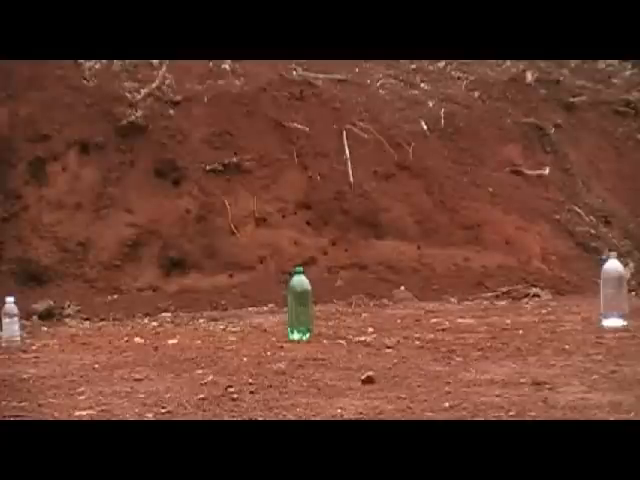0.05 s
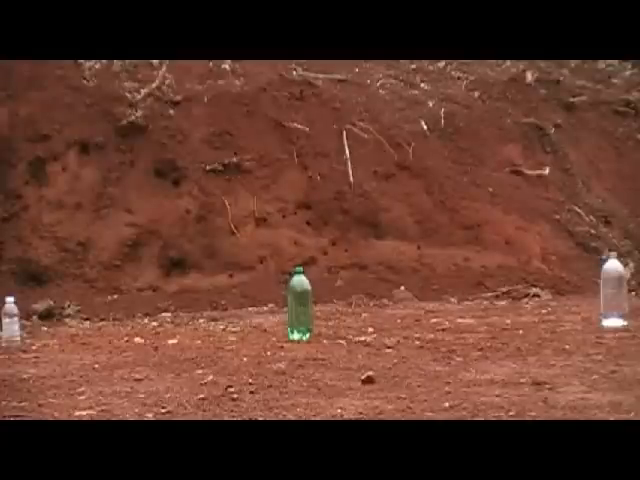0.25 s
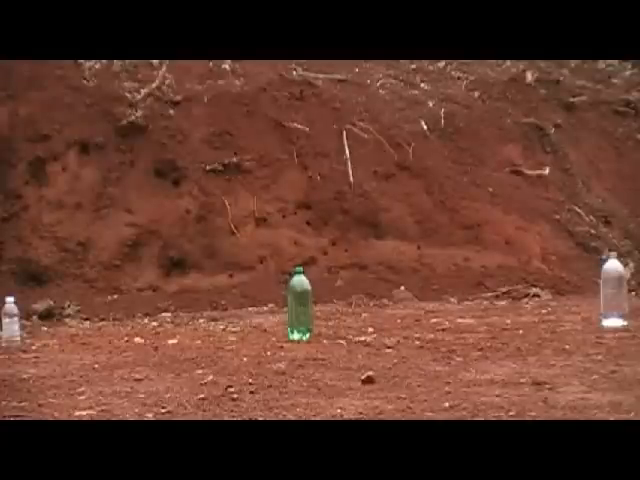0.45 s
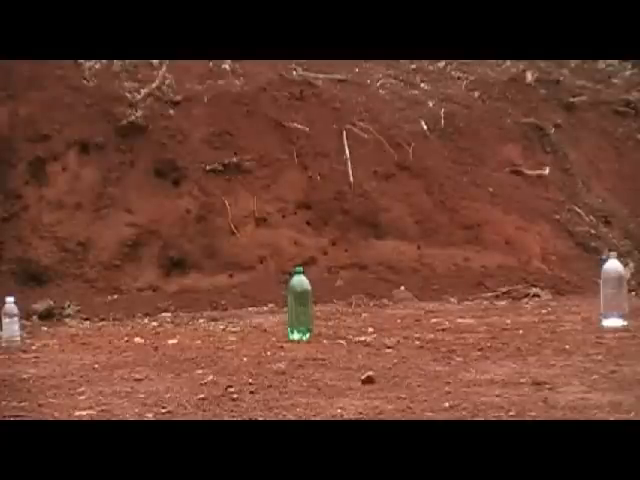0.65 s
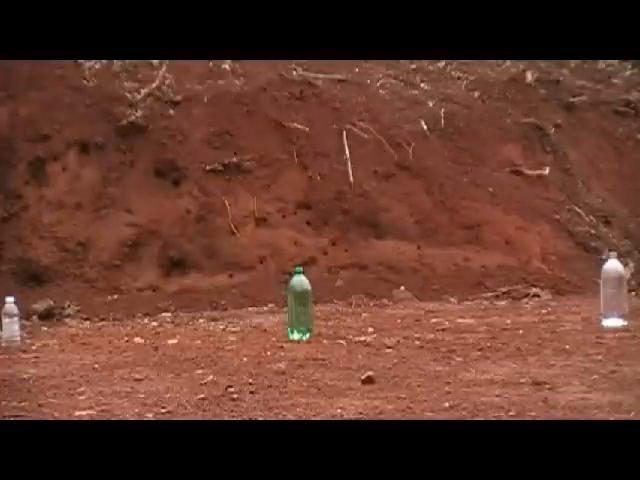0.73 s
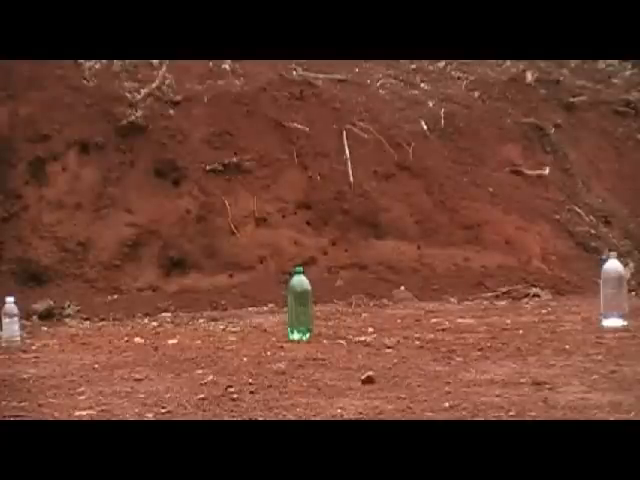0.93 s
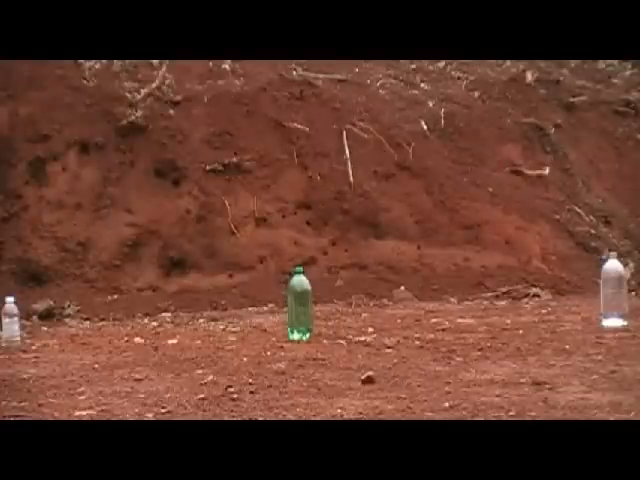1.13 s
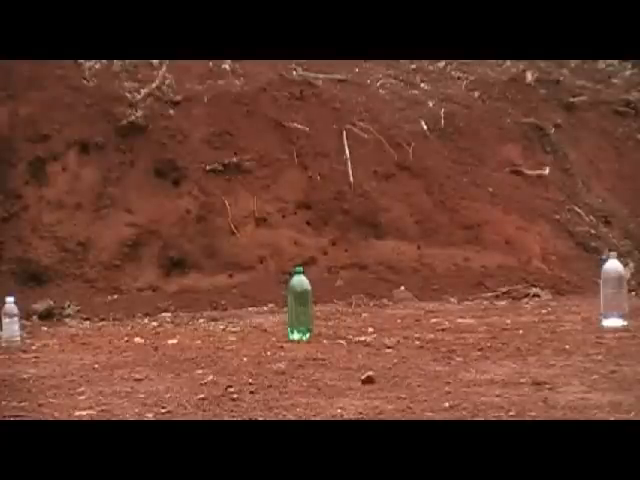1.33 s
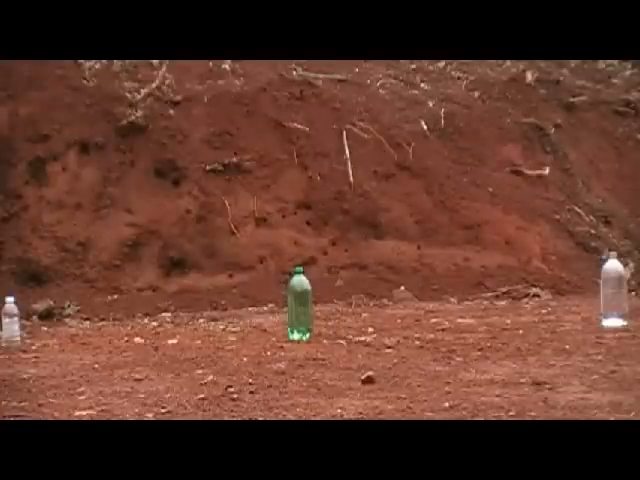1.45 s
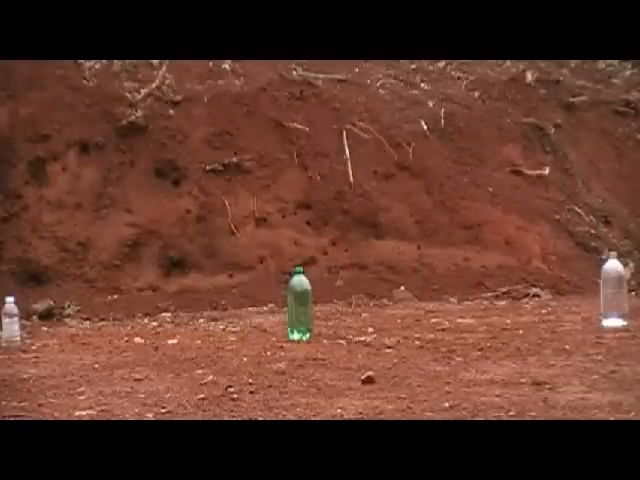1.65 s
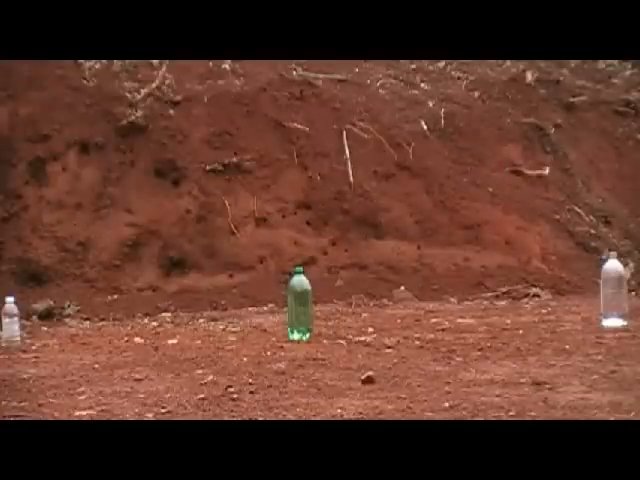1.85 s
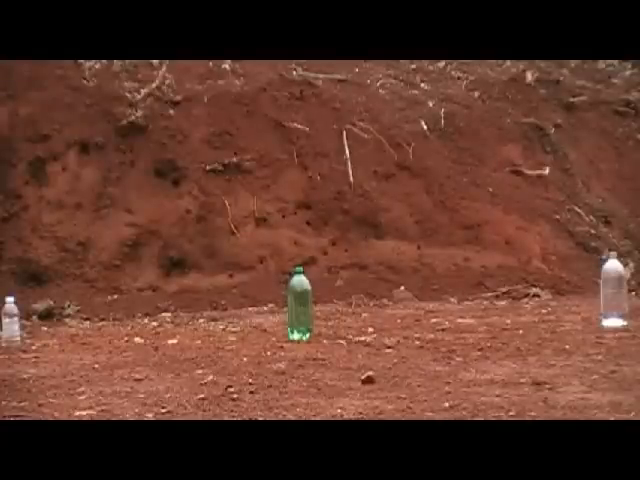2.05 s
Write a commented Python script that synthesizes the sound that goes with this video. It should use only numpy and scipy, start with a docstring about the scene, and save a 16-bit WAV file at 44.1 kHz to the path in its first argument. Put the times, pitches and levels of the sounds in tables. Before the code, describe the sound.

Close by in the open air, a shotgun's pump scrapes and clatters open, then slams shut with a brief steel ring. After a light rustle and a tick, the hammer clicks sharply without a shot, over faint air noise.

```python
"""Racking a pump-action shotgun

The action slides back and forward outdoors: friction and clashes excite the modes of the steel,
and the slide thumps at its end stops. Soft handling follows, a tick, then the click of the hammer.
The ground and an earth bank answer, and a gain control ducks the loudest moments.
Behind it lie faint air noise, a distant rumble and two thin bird notes."""
import sys
import numpy as np
from scipy import signal
from scipy.fft import rfft, irfft
from scipy.io import wavfile
from scipy.ndimage import uniform_filter1d

SR = 44100
rng = np.random.default_rng(int(sys.argv[2]) if len(sys.argv) > 2 else 0)


def int16_out(signal):
    """Quantize to a 16-bit WAV file."""
    q = np.round(np.clip(np.atleast_2d(signal).T, -1, 1) * 32767)
    wavfile.write(sys.argv[1], SR, q.astype(np.int16))


N = 92610
TIME_S = np.arange(N) / SR
FREQ_HZ = np.fft.rfftfreq(2 * N, 1 / SR)


def amp(db):
    """Amplitude grows tenfold for every 20 dB."""
    return 10 ** (np.asarray(db) / 20)


def unit_rms(x):
    """Normalisation to a mean power of one."""
    return x / np.sqrt(np.mean(x ** 2) + 1e-20)


def add(track, start_s, piece):
    """Superposition: a short sound sums into a track."""
    track[..., round(start_s * SR):][..., :piece.shape[-1]] += piece


def spectrum(points):
    """A spectral envelope joins (frequency_hz, gain_db) points on a log frequency axis."""
    hz, db = np.transpose(points)
    return amp(np.interp(np.log(FREQ_HZ + 1), np.log(hz + 1), db))


def minimum_phase(gain):
    """Folding the cepstrum gives a causal response with this gain."""
    cepstrum = irfft(np.log(np.maximum(gain, 1e-6)))
    cepstrum[1:N] *= 2
    cepstrum[N + 1:] = 0
    return np.exp(rfft(cepstrum))


def filtered(x, response):
    """Convolution in time is multiplication in frequency."""
    return irfft(rfft(x, 2 * N) * response)[..., :N]


def resonance(hz, width_hz):
    """A damped oscillator responds most at its natural frequency."""
    damping = 1j * FREQ_HZ * width_hz
    return damping / (hz ** 2 - FREQ_HZ ** 2 + damping)


# Spectrum of the air noise: frequency_hz, gain_db
AIR_SPECTRUM = [(15, -48.5), (25, -22.5), (102, -11), (500, -16.5), (2100, -24.5), (11800, -43.5),
                (13000, -66)]

def background():
    """Filtered noise: a broad band is heard as air, a narrow low band as distant rumble."""
    air = unit_rms(filtered(rng.standard_normal((2, N)), spectrum(AIR_SPECTRUM)))
    rumble = unit_rms(filtered(rng.standard_normal(N), resonance(hz=100.7, width_hz=19) ** 2))
    return (amp(-57.5) * air + amp(-64) * rumble) * amp([[-1], [1]])  # louder on the right


def grit(depth_db, size=N):
    """Tiny uneven contacts modulate noise. Rows: common to both microphones, differing between them."""
    noise = rng.standard_normal((2, size))
    roughness = unit_rms(uniform_filter1d(rng.standard_normal(size), size=16))
    return unit_rms(noise * amp(depth_db * roughness))


def burst(start_s, hold_s, t60_s, size=N, attack_s=0.0003):
    """A transient's envelope rises, holds and decays exponentially."""
    t = np.arange(size) / SR - start_s
    return np.clip(t / attack_s, 0, 1) * amp(-60 * np.maximum(t - hold_s, 0) / t60_s)


def chatter(length_s, t60_s, size=4096):
    """An impact is a run of tiny hard contacts, so its energy spreads evenly over frequency."""
    envelope = burst(0, length_s, t60_s, size)
    contacts = envelope * grit(depth_db=3, size=size)
    whitened = irfft(np.exp(1j * np.angle(rfft(contacts))))
    return unit_rms(whitened * np.sqrt(envelope)) * np.sqrt(np.mean(envelope ** 2))


def struck_part(force, hz, width_hz):
    """A small steel part rings in one mode, in proportion to the force on it."""
    mode = signal.iirpeak(hz, hz / width_hz, SR)
    return force.std() * unit_rms(signal.lfilter(*mode, force))


def radiate(force, body, treble_hz, bass_hz=753.6):
    """Source and filter: the bass, middle and treble of a force drive a body's response."""
    bass = 1 / (1 + (FREQ_HZ / bass_hz) ** 4)
    treble = 1 - 1 / (1 + (FREQ_HZ / treble_hz) ** 6)
    low, middle, high = rfft(force, 2 * N)
    drive = low * bass + middle * (1 - bass - treble) + high * treble
    return irfft(drive * body)[:, :N]


# Broad response of the whole gun: frequency_hz, gain_db
BODY_SPECTRUM = [(40, -42), (189, -16), (294, -10.5), (600, -12), (1030, -9), (1290, -8), (1910, 3.5),
                 (2270, -9), (2690, 1), (3050, -5.5), (3530, -1.5), (9220, -6.5), (11000, -13.5),
                 (12700, -16.5), (14000, -30.5)]

def steel_body(modes):
    """Modes add in power to the gun's broad response; the slower the decay, the narrower the peak."""
    power = unit_rms(spectrum(BODY_SPECTRUM)) ** 2
    for hz, db, t60_s in modes:
        peak = abs(resonance(hz, width_hz=np.log(1000) / np.pi / t60_s))
        power += (amp(db - 3) * unit_rms(peak)) ** 2
    return minimum_phase(np.sqrt(power))


# Clashes of steel parts: start_s, level_db, length_s, bass_db, treble_db, part_hz, part_db
CLASHES = [(0.1987, -48.5, 0.006, 7, -28, 2000, 4.5), (0.208, -35, 0.0028, 7.5, -36, 3000, -0.5),
           (0.2195, -33.5, 0.0056, -4.5, -10, 2000, -7.5), (0.226, -27, 0.003, -2, -9.5, 1880, -10),
           (0.2286, -17.5, 0.0042, -4, -3, 2020, -17), (0.2556, -20, 0.004, 2, 4, 1640, -5.5),
           (0.2717, -16, 0.0039, -9.5, 2, 3170, -12.5), (0.2938, -15, 0.0048, -3, 3.5, 1560, -5),
           (0.2989, -11, 0.0025, 3, 1.5, 3340, -6.5), (0.3033, -10, 0.0013, 8, 10, 1130, -7.5),
           (0.3267, -19.5, 0.0071, -3, 8, 1170, -1.5), (0.3473, -20, 0.0014, -4, 7.5, 6000, 1.5),
           (0.357, -26, 0.0071, 11.5, 9, 1430, -5.5), (0.412, -32, .002, 12, 3.5, 2600, -15),
           (0.431, -40, 0.0011, 2, 7, 1950, 2.5), (0.474, -39, 0.0011, 10, -1.5, 1990, 0),
           (0.5489, -38.5, 0.0036, -11, -10.5, 1890, -6), (0.555, -22.5, 0.0017, -7.5, -7, 4500, -8),
           (0.579, -22.5, 0.0032, -13, -4.5, 3320, 0), (0.5845, -15.5, 0.0022, -17.5, 3.5, 3754, -2.5),
           (0.596, -19, 0.007, 7, -1, 1820, -13.5), (0.6117, -13.5, 0.0068, -1, -5.5, 2950, -9.5),
           (0.6186, -10, 0.0045, 5, -3, 1880, -15), (0.6407, -17, 0.0041, 13, -6.5, 1850, -2.5),
           (0.65, -19, 0.01, 4, 0.5, 9240, -5.5), (0.662, -10, 0.0032, 7.5, 7.5, 2680, -9),
           (0.6706, -13, 0.0029, 8, 5.5, 7880, 1), (0.6778, -11.5, 0.0039, 6, 1.5, 1740, -2),
           (0.681, -6.5, 0.0027, 0.5, 7, 2870, -11.5), (0.6865, -11, 0.0031, -8.5, 5, 1472, -9)]
# Fore-end rubbing along the tube, back stroke then forward stroke: time_s, level_db
SLIDE_STROKES = [
    [(.205, -63), (.24, -37.5), (.25, -40), (.285, -28), (.34, -22.5), (.372, -36.5), (.43, -42),
     (.53, -53)],
    [(.55, -43), (.575, -37), (.595, -28), (.61, -21.5), (.628, -18), (.655, -27), (.69, -33),
     (.715, -34.5)],
]
# Modes of receiver and barrel, opening then closing: pitch_hz, relative_db, t60_s
STEEL_MODES = [
    [(222, -30.5, .25), (1144, -12, .09), (1628, -8, 0.082), (2000, -11.5, .1), (3250, -9, .04),
     (4600, -12.5, .03), (5450, -11.5, .03), (6084, -10.5, 0.033)],
    [(324, -23.5, 0.089), (1077, -13, .03), (1789, -13, .06), (2730, -12, 0.027), (3355, -11, 0.037),
     (4210, -10, .06), (5540, -9.5, 0.033), (7000, -12.5, .03), (9100, -12.5, .04)],
]

def pump_action():
    """Impact and sliding friction force the gun to vibrate, in different modes as it opens and closes."""
    force, sound = np.zeros((3, 2, N)), np.zeros((2, N))
    for start_s, db, length_s, bass_db, treble_db, part_hz, part_db in CLASHES:
        clash = amp(db) * chatter(length_s, t60_s=0.023)
        add(force, start_s, amp([bass_db, 0, treble_db])[:, None, None] * clash)
        add(sound, start_s, amp(part_db) * struck_part(clash, part_hz, width_hz=150))
    friction_bands = amp([5.5, 0, 0.5])[:, None, None]  # bass, middle, treble
    for stroke in SLIDE_STROKES:
        times_s, db = np.transpose(stroke)
        sliding = (TIME_S > times_s[0]) * (TIME_S < times_s[-1])
        pressure = amp(np.interp(TIME_S, times_s, db)) * sliding
        force += friction_bands * pressure * grit(depth_db=4.5)
    opening = TIME_S < SLIDE_STROKES[0][-1][0]  # until the back stroke ends
    for during, modes in zip([opening, ~opening], STEEL_MODES):
        sound += radiate(force * during, steel_body(modes), treble_hz=5650)
    return sound


def damped_sine(start_s, db, hz, t60_s):
    """Free vibration of one mode dies away exponentially."""
    t = np.maximum(TIME_S - start_s, 0)
    return amp(db - 60 * t / t60_s) * np.sin(2 * np.pi * hz * t)


# The slide hitting its end stops: start_s, level_db
STOP_IMPACTS = [(0.299, -35.5), (.678, -31)]

def end_stops():
    """Each sudden stop excites a low, heavily damped vibration: a thump."""
    return sum(damped_sine(start_s, db, hz=62, t60_s=0.04) for start_s, db in STOP_IMPACTS)


# High modes struck as the bolt locks: pitch_hz, relative_db, t60_s
BOLT_MODES = [(5647, -4, .26), (6266, 0, .31), (9925, -4, .25)]

def bolt_lock(start_s=0.681, level_db=-29):
    """Lightly damped modes keep the steel singing after the bolt locks."""
    return sum(damped_sine(start_s, level_db + db, hz, t60_s) for hz, db, t60_s in BOLT_MODES)


# Soft handling rustle, then at 2 s a faint echo of the hammer click from the bank: time_s, level_db
HANDLING_AND_ECHO_LEVELS = [(0.929, -59.5), (.99, -54), (1.08, -58), (1.2, -61), (1.32, -71), (1.88, -100),
                            (2.0, -62), (2.1, -77.5)]
# Spectrum shared by rustle and echo: frequency_hz, gain_db
HANDLING_AND_ECHO_SPECTRUM = [(100, -18), (500, 3), (3000, 3.5), (6000, -7.5), (10000, -19), (13000, -41)]

def handling_and_echo():
    """Swells of uneven noise stand for handling friction, then the bank's diffuse echo of the hammer."""
    times_s, db = np.transpose(HANDLING_AND_ECHO_LEVELS)
    envelope = amp(np.interp(TIME_S, times_s, db)) * (TIME_S > times_s[0])
    return envelope * unit_rms(filtered(grit(depth_db=3.5), spectrum(HANDLING_AND_ECHO_SPECTRUM)))


# Clicks of trigger and hammer: start_s, level_db, length_s, treble_db, part_hz, part_db
TRIGGER_CLICKS = [(1.116, -48, 0.0009, 0.5, 4340, -6), (1.1213, -41, 0.0027, -10.5, 4270, -4),
                  (1.1249, -35.5, 0.0034, -5, 3480, -14), (1.2, -58, 0.0022, -7, 8830, 0.5),
                  (1.3945, -59.5, 0.0011, -16, 4020, -1), (1.594, -53, 0.0042, -16, 3750, -8),
                  (1.783, -18.5, 0.0026, 1, 4700, -17.5), (1.7957, -37, .0006, 8, 5000, -3.5)]
# Modes of the trigger group: pitch_hz, width_hz, relative_db
TRIGGER_MODES = [(344, 90, -2), (976, 100, -12), (1580, 63, 5), (1714, 155, 7.5), (2383, 123, 0.5),
                 (2716, 136, -3), (3925, 137, -1.5), (4720, 610, -3), (6060, 450, -3), (7480, 244, -1.5),
                 (7820, 143, -0.5), (8530, 370, 2)]

def trigger_group():
    """Brief impacts on well-damped modes are heard as clicks; each also rings a small part of its own."""
    force, parts = np.zeros((3, 2, N)), np.zeros((2, N))
    for start_s, db, length_s, treble_db, part_hz, part_db in TRIGGER_CLICKS:
        snap = amp(db) * chatter(length_s, t60_s=0.012)
        add(force, start_s, amp([0, 0, treble_db])[:, None, None] * snap)
        add(parts, start_s, amp(part_db) * struck_part(snap, part_hz, width_hz=450))
    modes = sum(amp(db) * resonance(hz, width_hz) for hz, width_hz, db in TRIGGER_MODES)
    crack = amp(-14) * unit_rms(spectrum(BODY_SPECTRUM))
    body = minimum_phase(np.hypot(unit_rms(abs(modes)), crack))
    return parts + radiate(force, body, treble_hz=2366)


# Distant bird notes: start_s, length_s, pitch_hz, rise_hz, level_db
BIRD_NOTES = [(1.697, 0.0517, 7400, 798, -74), (2.019, 0.062, 7630, 30.1, -70)]

def birds():
    """Frequency modulation: each whistle is a pure tone whose pitch rises and falls in an arch."""
    sound = np.zeros(N)
    for start_s, length_s, hz, rise_hz, db in BIRD_NOTES:
        arch = np.sin(np.pi * np.clip((TIME_S - start_s) / length_s, 0, 1))
        phase = 2 * np.pi * np.cumsum(hz + rise_hz * arch) / SR
        sound += amp(db) * np.sqrt(abs(arch)) * np.sin(phase)
    return sound


# Scatter from nearby ground: frequency_hz, gain_db
GROUND_SPECTRUM = [(100, -22.5), (500, -11), (2000, -16), (8000, -10), (13000, -14.5)]

def ground_scatter(x):
    """Diffuse reflection gives each microphone its own short, decaying tail."""
    reflected = filtered(x, minimum_phase(spectrum(GROUND_SPECTRUM)))
    tail = rng.standard_normal((2, N)) * burst(start_s=0.0033, hold_s=0, t60_s=0.13)
    tail /= np.linalg.norm(tail, axis=1, keepdims=True)
    return filtered(reflected, rfft(tail, 2 * N))


# Returns from the ground, the earth bank and the wider surroundings: level_db, delay_s, t60_s
REFLECTIONS = [(-19, 0.0085, 0.15), (-36.5, .15, .22), (-32.5, 0.022, 1)]
# Spectrum of their reverberation: frequency_hz, gain_db
REVERB_SPECTRUM = [(100, -12.5), (400, 1.5), (2000, 2.5), (5000, 1), (9500, -6.5), (12500, -24.5)]

def reverberation(x):
    """Countless reflections add incoherently, into noise that trails the power of the source."""
    decay = sum((amp(db) * unit_rms(burst(delay_s, 0, t60_s))) ** 2
                for db, delay_s, t60_s in REFLECTIONS) / N
    power = abs(filtered(x ** 2, rfft(decay, 2 * N)))
    return np.sqrt(power) * unit_rms(filtered(rng.standard_normal((2, N)), spectrum(REVERB_SPECTRUM)))


# Sound that differs between the two microphones: frequency_hz, gain_db
SIDE_SPECTRUM = [(100, -13), (1200, -11), (4000, -7), (12000, -11.5)]

def direct_path(common, differing, pan_db=3.5, left_lag_s=2.6e-5):
    """Differences in level and arrival time place the gun slightly to the right."""
    side = np.array([[1], [-1]])
    stereo = common + side * filtered(differing, spectrum(SIDE_SPECTRUM))
    delay = np.exp(-1j * np.pi * side * FREQ_HZ * left_lag_s)
    return filtered(stereo, amp(-side * pan_db / 2) * delay)


def scene():
    """The gun's direct sound, its reflections and the distant sources superpose."""
    common, differing = pump_action() + trigger_group() + handling_and_echo()
    common += end_stops() + bolt_lock()
    gun = direct_path(common, differing) + ground_scatter(common) + reverberation(common)
    return gun + background() + birds()


def record(dry):
    """Automatic gain control ducks loud sounds and recovers steadily; clipping and a low-pass follow."""
    threshold_db, slope, recovery_db_per_s = -25.5, 0.41, 18
    ceiling, cutoff_hz = 0.85, 13200
    power = uniform_filter1d(np.mean(dry ** 2, axis=0), size=882)  # 20 ms average
    excess_db = np.maximum(10 * np.log10(abs(power) + 1e-12) - threshold_db, 0)
    recovery_db = recovery_db_per_s * TIME_S
    cut_db = np.maximum.accumulate(slope * excess_db + recovery_db) - recovery_db
    clipped = np.clip(dry * amp(-cut_db), -ceiling, ceiling)
    return filtered(clipped, 1 / np.sqrt(1 + (FREQ_HZ / cutoff_hz) ** 70))


dry = scene()
out = record(dry)
int16_out(out)
```